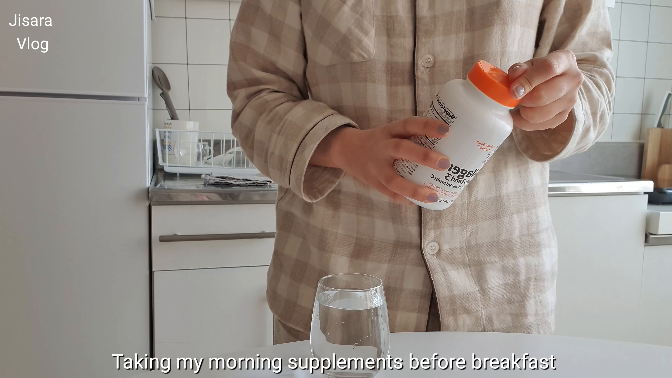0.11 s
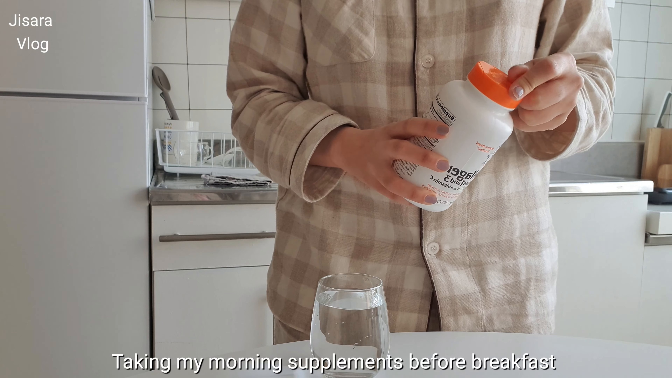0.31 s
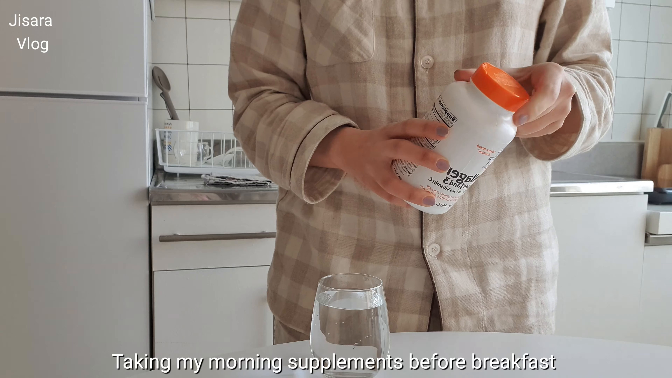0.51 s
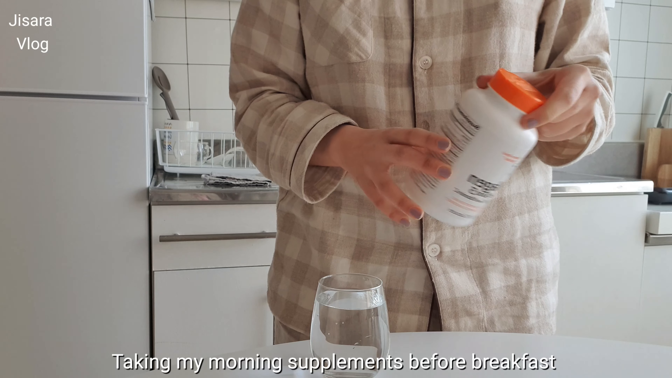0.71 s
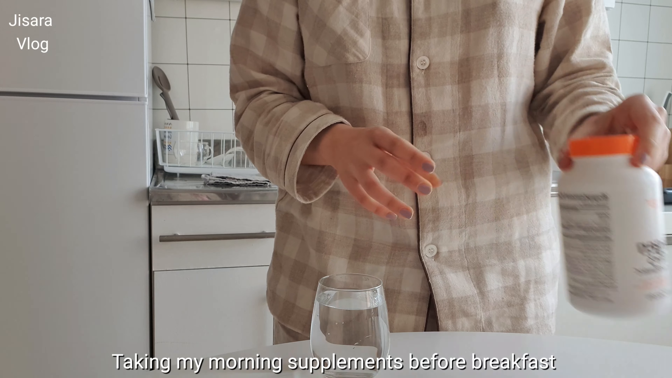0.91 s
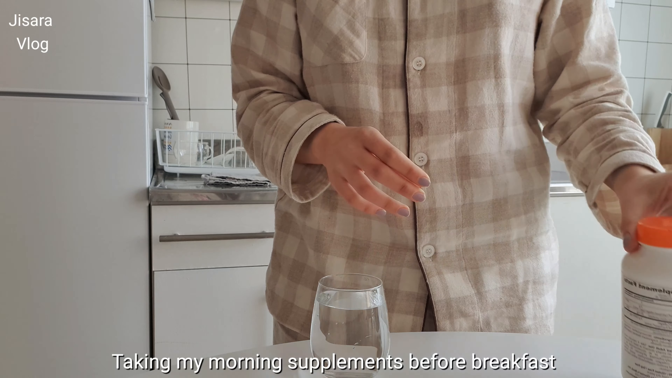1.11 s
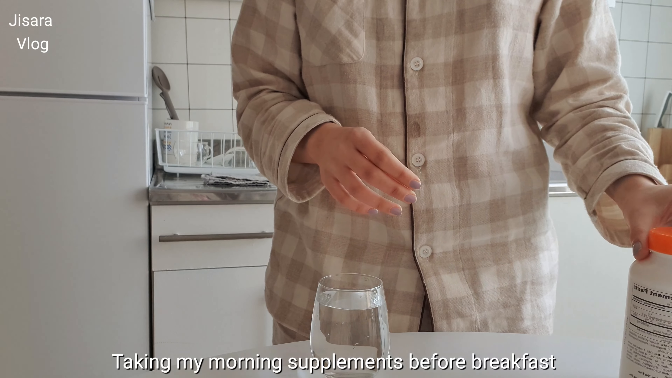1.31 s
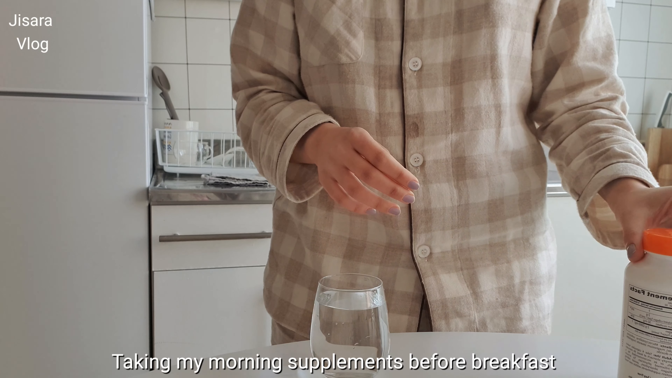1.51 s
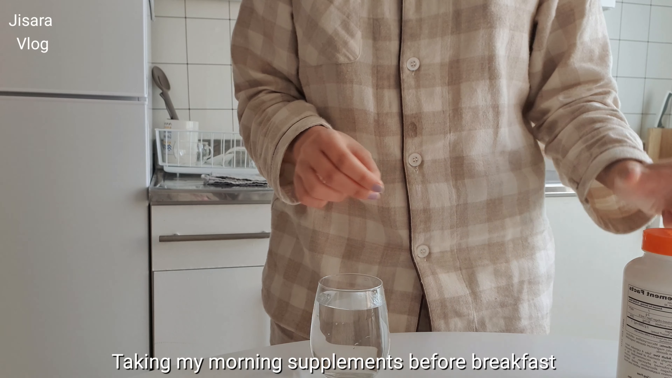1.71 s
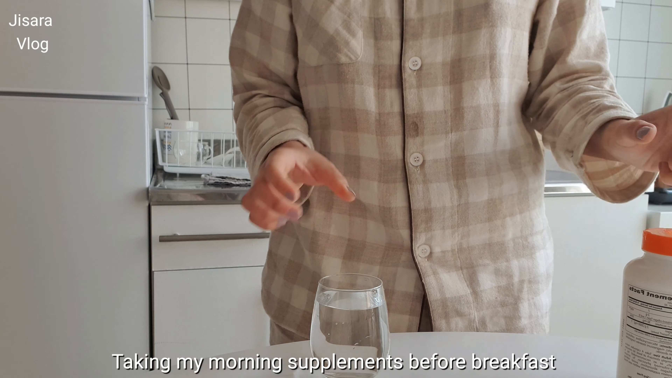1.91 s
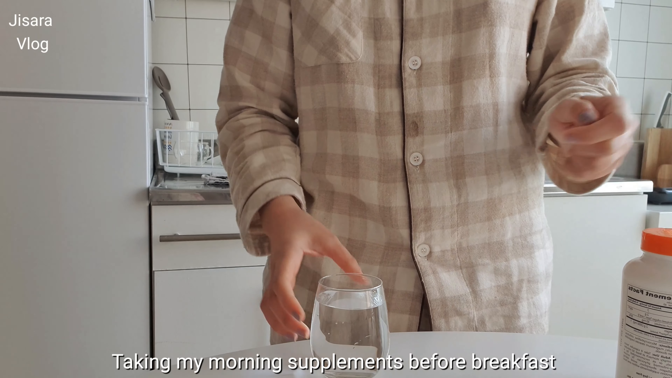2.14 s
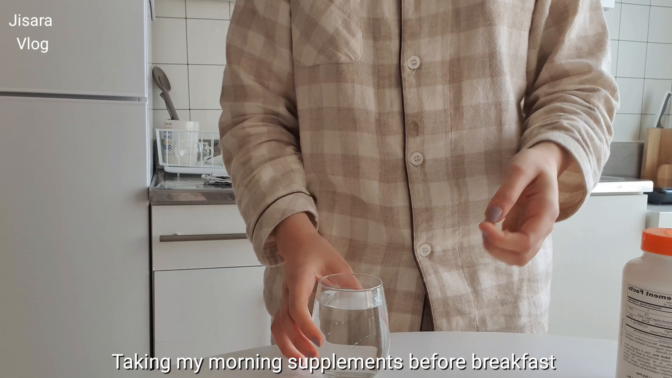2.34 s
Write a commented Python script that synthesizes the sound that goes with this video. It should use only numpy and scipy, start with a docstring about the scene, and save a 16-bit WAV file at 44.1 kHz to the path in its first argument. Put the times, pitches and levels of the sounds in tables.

```python
"""A plastic pill bottle is handled in a small tiled kitchen.
Its flip lid snaps shut and fingers tick on the plastic. As it swings upright, pills slide down the wall.
The rim grazes a table, the base lands and the table top rings with a hollow thud.
The fingers let go and the bottle settles. A low rumble with a hum and a faint hiss lie under it all."""
import sys
import numpy as np
from scipy import signal
from scipy.fft import rfft, irfft
from scipy.io import wavfile

SR = 44100
rng = np.random.default_rng(int(sys.argv[2]) if len(sys.argv) > 2 else 0)


def transcribe(u):
    """Save the signal u as a 16-bit wav file named by the first command-line argument.

    u: samples, shape (n,) or (channels, n), limited to [-1, 1]; the rate is SR.
    q: integer samples, one column per channel.
    """
    v = np.clip(np.atleast_2d(u).T, -1, 1)
    q = np.round(v * 32767).astype(np.int16)
    wavfile.write(sys.argv[1], SR, q)


N = 105840

# Diffuse field of the kitchen. Each row: frequency in Hz, left-right correlation.
ROOM_CORRELATION = [(100, 0.89), (300, .88), (600, .6), (1200, 0), (2500, 0), (6000, 0), (14000, 0.059)]
BOTTLE_LOSS, BOTTLE_DAMPING_HZ, BOTTLE_CONTACT_HZ = .09, 70, 8500


def lid():
    """The lid catches, snaps home and rebounds; the main click reflects nearby and fills the room."""
    # Each row: time in seconds, strength in dB.
    snaps = [(0.232, -11), (0.2345, 1.5), (0.2366, -10)]
    # Lid and closed bottle. Each row: frequency in Hz, peak in dB.
    lid_modes = [(170, 11.5), (290, 14.5), (440, 10), (1160, 9), (1440, 10), (1700, 8), (2250, 3),
                 (2720, 9), (3600, -7.5), (4500, -11.5), (5400, -4.5), (6600, -7), (8500, -8), (10000, -6),
                 (12000, -12), (14600, -11)]
    # Each row: frequency in Hz, room send in dB.
    room_send = [(80, 4), (170, -2), (280, -3), (500, 3.5), (900, 8.5), (1500, 3.5), (2000, 7), (2700, -2),
                 (4000, 6.5), (6000, 1.5), (10000, 0), (15000, 2.5)]
    echo_delay_s, echo_db = .0053, -11
    modes = plastic(lid_modes, loss=.13, damping_hz=90)
    catch, home, rebound = (soften(resonate(clicks([row]), modes), contact_hz=13000) for row in snaps)
    echo_click = clicks([(snaps[1][0] + echo_delay_s, 0)])
    echo = from_db(echo_db) * soften(resonate(echo_click, modes[3:]), contact_hz=5000)
    return place(home - catch + rebound, pan_db=-4, lag_s=.00006) + echo + kitchen(home, room_send)


def pills():
    """Pills tumble down the wall: a shower of small contacts, each its own colour, and a few hard hits."""
    # Each row: time in seconds, relative shower level in dB.
    flow = [(0.84, -37), (0.88, -23), (0.90, -7.5), (0.93, -2.5), (0.955, 6.5), (0.972, 4.5), (0.995, -5.5),
            (1.04, -11), (1.06, -28), (1.13, -57), (1.21, -46.5)]
    # Each row: time in seconds, wall knock in dB, pill click in dB.
    hard_hits = [(0.9217, -11, -20), (0.9390, -7, -16), (0.9455, -8, -14), (0.9515, -13, -3),
                 (0.9622, -10, -3), (0.9651, 4, -6), (0.9850, -7, -15), (1.0075, -19, -8),
                 (1.0425, -10, -13), (1.0460, -12, -11)]
    # Fingers shift their grip on the same wall. Each row: time in seconds, strength in dB.
    grip_shifts = [(0.131, -34.5), (0.684, -35.5), (1.759, -38.5)]
    # Each row of both: frequency in Hz, peak in dB.
    wall_modes = [(220, -18.5), (540, -9), (900, -7), (1170, 0.5), (1600, -5.5)]
    pill_modes = [(2850, -9), (3760, -9.5), (4450, -10), (6100, -19), (9100, -21.5), (11500, -29.5)]
    # Each row: frequency in Hz, room send in dB.
    room_send = [(200, 3.5), (600, -0.5), (1200, -6.5), (3000, -5), (9000, -8)]
    contacts_per_s, shower_gain_db, contact_spread_db, mode_spread_db = 1200, -18.5, 1.5, 2.0
    t = np.arange(N) / SR
    wall = plastic(wall_modes, BOTTLE_LOSS, BOTTLE_DAMPING_HZ)
    pill = plastic(pill_modes, BOTTLE_LOSS, BOTTLE_DAMPING_HZ)
    contacts = (rng.random(N) < contacts_per_s / SR) & (t > flow[0][0]) & (t < flow[-1][0])
    shower = contacts * from_db(in_time(flow) + shower_gain_db + contact_spread_db * rng.standard_normal(N))
    rattle = 0
    for mode in wall + pill:
        polarity = rng.choice([-1, 1], N)
        coupling = from_db(mode_spread_db * rng.standard_normal(N))
        rattle += resonate(shower * polarity * coupling, [mode])
    rattle += resonate(clicks([(s, db) for s, db, _ in hard_hits] + grip_shifts), wall)
    rattle += resonate(clicks([(s, db) for s, _, db in hard_hits]), pill)
    rattle = soften(rattle, BOTTLE_CONTACT_HZ)
    return place(rattle, pan_db=-2.5, lag_s=.00008) + kitchen(rattle, room_send)


def set_down():
    """The rim grazes the table, the base lands and the table top rings; let go, the bottle settles."""
    # Each row of all three: time in seconds, strength in dB.
    graze = [(1.2812, -23.5)]
    landing = [(1.3441, -3.5), (1.3450, -25.5)]
    settling = [(1.578, -31)]
    # Each row of both: frequency in Hz, bandwidth in Hz, peak in dB.
    rim_modes = [(1200, 260, -6), (3010, 65, 10.5), (4600, 700, -18), (9100, 770, -9.5)]
    table_modes = [(55.6, 12, 19), (101.8, 12.6, 30), (115.4, 18, 19), (164, 7.7, 17), (180.7, 10, 24),
                   (217.2, 14, 22), (269.5, 6.1, 30.5), (303.2, 5, 23), (452, 6.9, 31), (538, 4.7, 1.5),
                   (626, 9.1, 17.5), (646, 5.3, 18.5), (770, 25, 13.5)]
    # Each row: frequency in Hz, peak in dB.
    base_modes = [(210, 10.5), (430, 10.5), (800, 3), (1180, -55), (1560, -14), (2320, 0), (3250, 0),
                  (5400, -31.5), (9300, -15), (13000, -23)]
    # Each row: frequency in Hz, room send in dB.
    room_send = [(80, 21.5), (200, 8.5), (500, -0.5), (1200, 14), (2300, 5), (3500, -7), (7000, 5),
                 (14000, -4)]
    pan_db, lag_s, table_send_db, rim_send_db = -6.5, .00016, -28, -5.5
    blow = -clicks(landing) + soften(clicks(settling), contact_hz=860)
    rim = soften(resonate(clicks(graze), rim_modes), BOTTLE_CONTACT_HZ)
    base = soften(resonate(blow, plastic(base_modes, loss=.17, damping_hz=110)), contact_hz=6900)
    table = soften(resonate(blow, table_modes), contact_hz=1500)
    room = kitchen(base + from_db(table_send_db) * table + from_db(rim_send_db) * rim, room_send)
    return place(rim + base, pan_db, lag_s) + place(table, 0, lag_s) + room


def fingers():
    """Thin ticks as the fingers leave the plastic."""
    # Each row: time in seconds, strength in dB, share that arrives directly.
    ticks = [(0.658, -27, 0.34), (0.667, -24, 0.32), (0.722, -23, .2), (0.736, -31, 0.27),
             (1.471, -40.5, 0.85), (1.5821, -25.5, 0.77)]
    # Each row: frequency in Hz, peak in dB.
    tick_modes = [(4000, -21), (8600, -8.5), (9800, -7), (12200, -18)]
    # Each row: frequency in Hz, room send in dB.
    room_send = [(1000, -4), (5000, 4.5), (9000, -4.5), (14000, 0)]
    contact_hz = 11400
    modes = plastic(tick_modes, BOTTLE_LOSS, BOTTLE_DAMPING_HZ)
    full_clicks = clicks([(s, db) for s, db, _ in ticks])
    direct_clicks = sum(share * clicks([(s, db)]) for s, db, share in ticks)
    full = soften(resonate(full_clicks, modes), contact_hz)
    direct = soften(resonate(direct_clicks, modes), contact_hz)
    return place(direct, pan_db=-13.5, lag_s=.00012) + kitchen(full, room_send)


def kitchen(x, room_send):
    """Diffuse reverberation that dies band by band; the late tail falls ever faster."""
    # Each row: frequency in Hz, T60 in seconds before the extra tail fall.
    decay_times = [(80, 0.96), (250, .46), (700, 0.71), (1500, 0.63), (3000, 0.549), (6000, 0.54),
                   (12000, 0.27)]
    gap_s, build_s, tail_fall_s, pan_db = .003, .003, .23, -1.0
    size = SR
    t = np.maximum(np.arange(size) / SR - gap_s, 0)
    hz, noise = stereo_noise(ROOM_CORRELATION, size)
    edges_hz = np.geomspace(200, 17000, 41) - 160
    build_up = 1 - np.exp(-t / build_s)
    response = 0
    for low, high in zip(edges_hz, edges_hz[1:]):
        centre_hz = np.sqrt(low * high)
        decay = np.exp(-np.log(1000) * t / at_hz(decay_times, centre_hz))
        band = irfft(noise * ((hz >= low) & (hz < high)), size) * build_up * decay
        to_unit_gain = np.sqrt(4 * (high - low) / SR / np.sum(band ** 2))
        response += band * from_db(at_hz(room_send, centre_hz)) * to_unit_gain
    response *= np.exp(-(t / tail_fall_s) ** 2)
    return signal.fftconvolve(x[None], response, axes=1)[:, :N] * from_db([[pan_db / 2], [-pan_db / 2]])


def rumble():
    """Low noise and a hum that swell and sink together."""
    # Each row: frequency in Hz, relative density in dB.
    spectrum = [(20, -8), (30, -9), (42, -4.5), (60, 5.5), (80, -2.5), (120, -14), (200, -28.5)]
    # Each row: time in seconds, gain in dB.
    swell = [(0, -8.5), (0.3, 6), (0.65, -3), (0.82, -3), (1.0, 12.5), (1.2, -6.5), (1.55, 0), (1.83, -9),
             (2.0, 5.5), (2.21, 3), (2.26, -6.5), (2.4, 0)]
    hum_hz = 57.7
    hum = from_db(-68.5) * np.sqrt(2) * np.sin(2 * np.pi * (hum_hz * np.arange(N) / SR + rng.random()))
    noise = from_db(-67) * steady_noise(spectrum, ROOM_CORRELATION)
    return from_db(in_time(swell)) * (noise + hum)


def hiss():
    """Faint, steady, wide noise."""
    # Each row: frequency in Hz, relative density in dB.
    spectrum = [(76, -22), (130, -3), (223, -18.5), (267, -13), (301, -20.5), (415, -22), (1000, -30.5),
                (2180, -30.5), (6560, -41.5), (15500, -39)]
    # Each row: frequency in Hz, left-right correlation.
    correlation = [(130, 0.3), (500, 0.48), (1500, 0.14), (10000, 0.033)]
    return from_db(-75) * steady_noise(spectrum, correlation)


def plastic(modes, loss, damping_hz):
    """Plastic rings briefly: a mode's bandwidth is a constant plus a share of its frequency."""
    return [(hz, damping_hz + loss * hz, db) for hz, db in modes]


def resonate(x, modes):
    """Parallel resonators of alternating sign. Each mode: frequency in Hz, bandwidth in Hz, peak in dB."""
    out = 0
    for k, (hz, width_hz, db) in enumerate(modes):
        radius = np.exp(-np.pi * width_hz / SR)
        b = np.array([1, 0, -1]) * (1 - radius * radius) / 2
        a = [1, -2 * radius * np.cos(2 * np.pi * hz / SR), radius * radius]
        out += (-1) ** k * from_db(db) * signal.lfilter(b, a, x + 1e-18)
    return out


def soften(x, contact_hz):
    """Plastic gives way on contact, which takes off the top."""
    return signal.sosfilt(signal.butter(2, contact_hz, fs=SR, output="sos"), x + 1e-18)


def clicks(rows):
    """Impulses. Each row: time in seconds, strength in dB."""
    out = np.zeros(N)
    for s, db in rows:
        out[int(round(s * SR))] += from_db(db)
    return out


def place(x, pan_db, lag_s):
    """Direct sound from the right: the left side lags; pan_db is left minus right."""
    n = np.arange(N)
    delayed = np.interp(n - round(lag_s * SR), n, x)
    return np.array([delayed * from_db(pan_db / 2), x * from_db(-pan_db / 2)])


def steady_noise(spectrum, correlation):
    """Stereo noise shaped by a spectrum and limited to its range; rms 1."""
    hz, noise = stereo_noise(correlation, N)
    in_range = (hz >= spectrum[0][0]) & (hz <= spectrum[-1][0])
    x = irfft(noise * from_db(at_hz(spectrum, hz)) * in_range, N)
    return x / x.std()


def stereo_noise(correlation, size):
    """Bin frequencies and flat spectra of two partly correlated noises."""
    hz = np.arange(size // 2 + 1) * SR / size
    alike = np.clip(at_hz(correlation, hz), -1, 1)
    mid, side = rfft(rng.standard_normal((2, size)))
    return hz, np.sqrt((1 + alike) / 2) * mid + np.sqrt((1 - alike) / 2) * side * np.array([[1], [-1]])


def at_hz(rows, hz):
    """Interpolate along log frequency."""
    row_hz, values = np.transpose(rows)
    return np.interp(np.log(np.maximum(hz, 1)), np.log(row_hz), values)


def in_time(rows):
    """Interpolate at every sample."""
    return np.interp(np.arange(N) / SR, *np.transpose(rows))


def from_db(db):
    """Decibels to gain."""
    return 10 ** (np.asarray(db) / 20)


def scene():
    """All sources together."""
    return lid() + pills() + set_down() + fingers() + rumble() + hiss()


def record(dry):
    """Steep low-pass."""
    cutoff_hz = 15900
    return signal.sosfilt(signal.ellip(10, .1, 70, cutoff_hz, fs=SR, output="sos"), dry)


dry = scene()
out = record(dry)
transcribe(out)
```